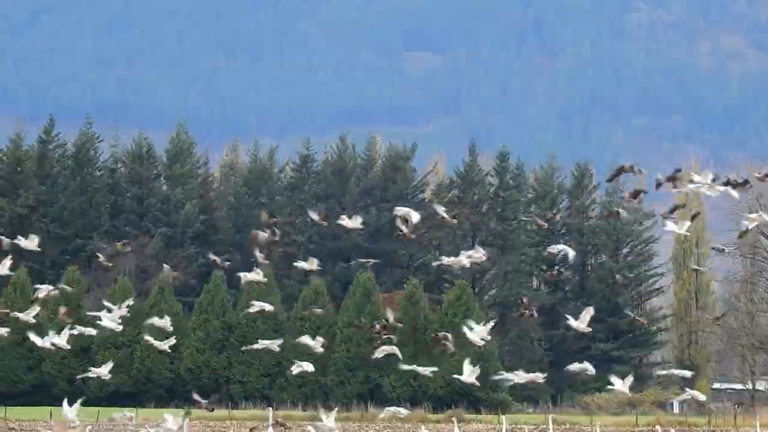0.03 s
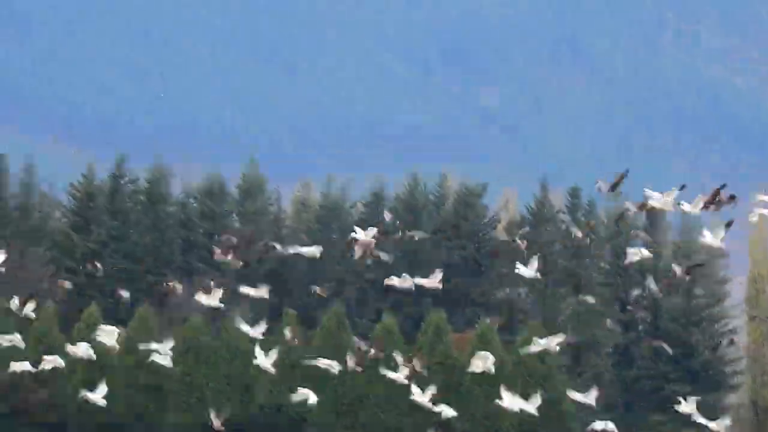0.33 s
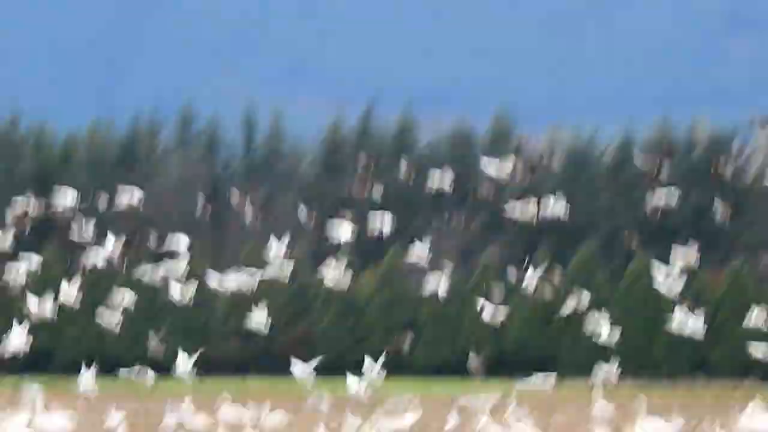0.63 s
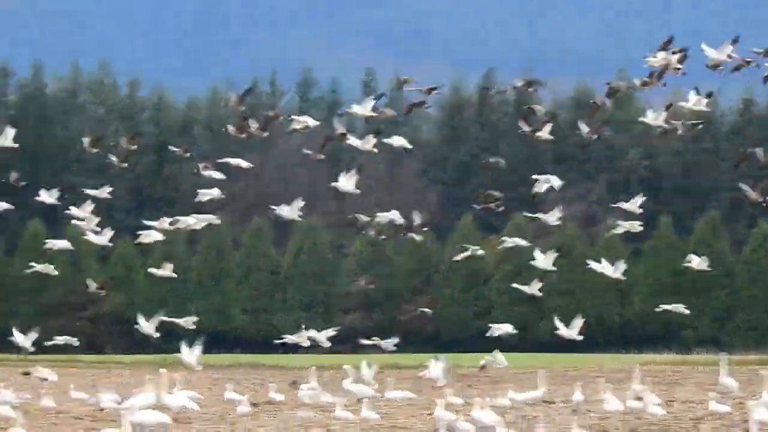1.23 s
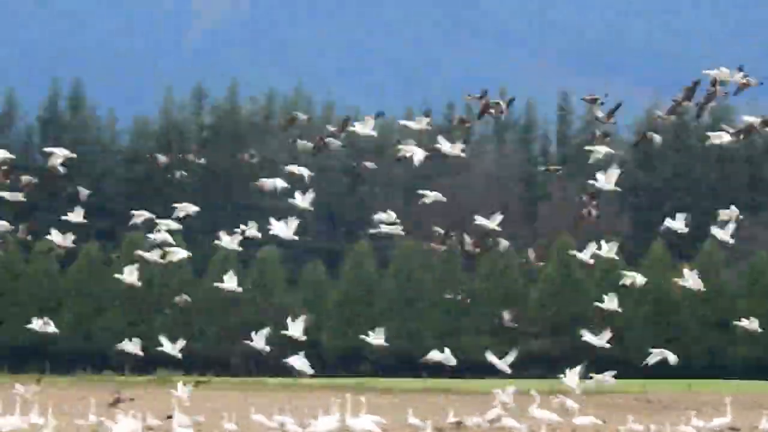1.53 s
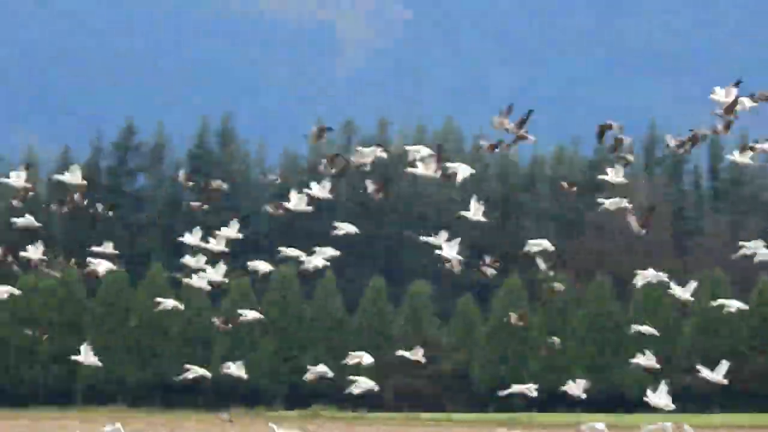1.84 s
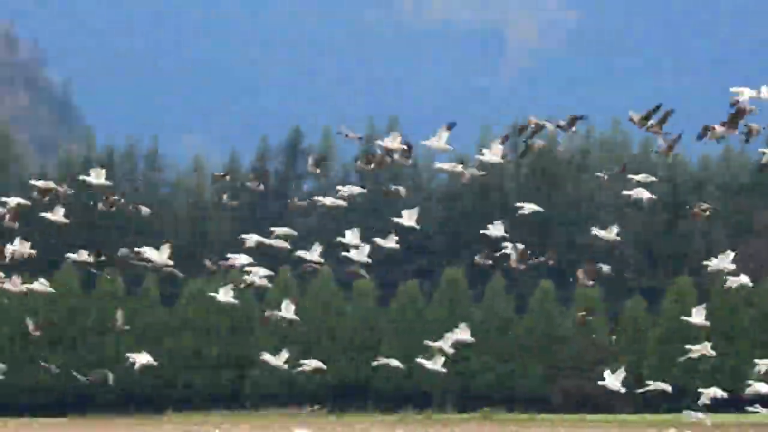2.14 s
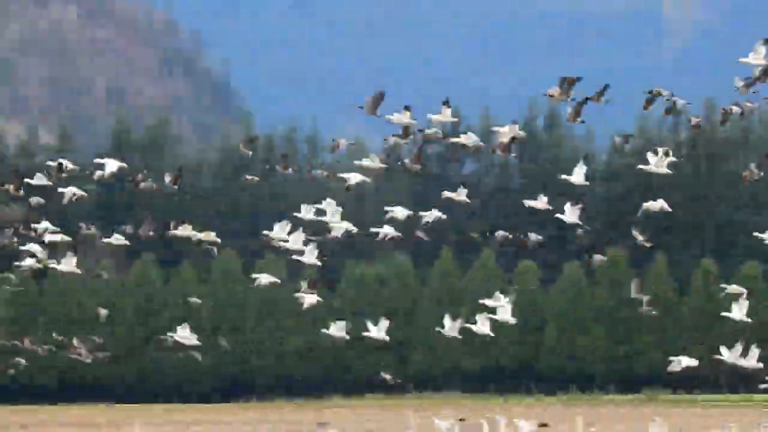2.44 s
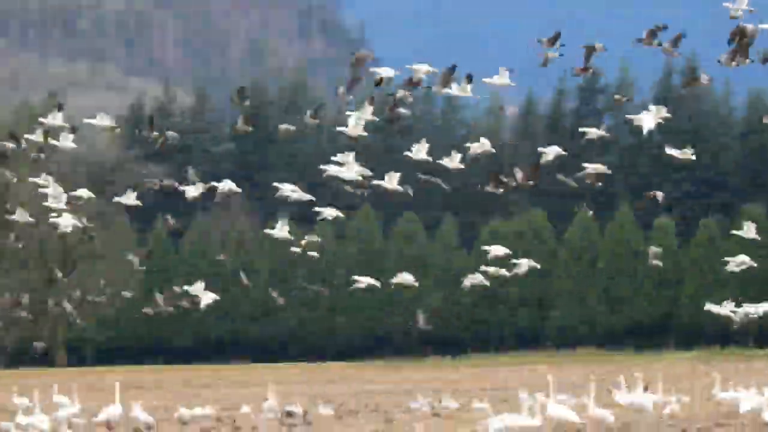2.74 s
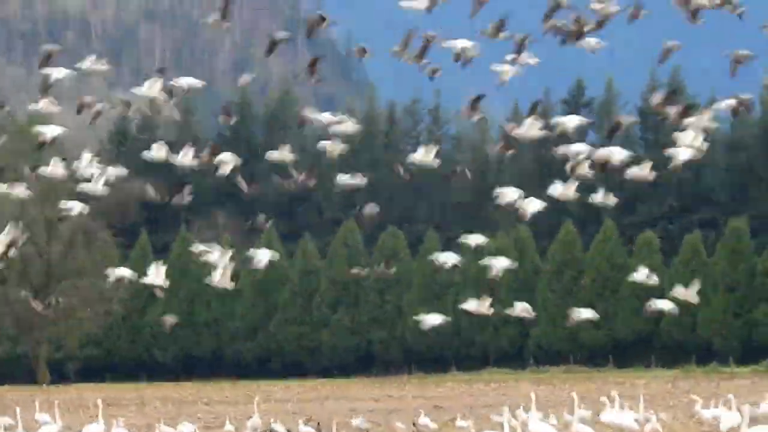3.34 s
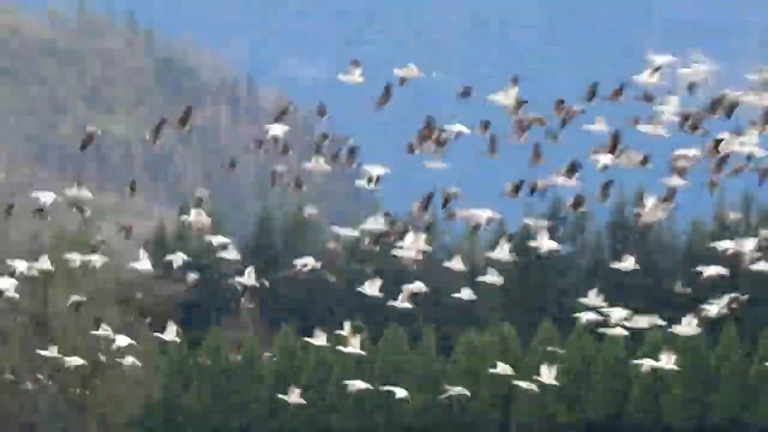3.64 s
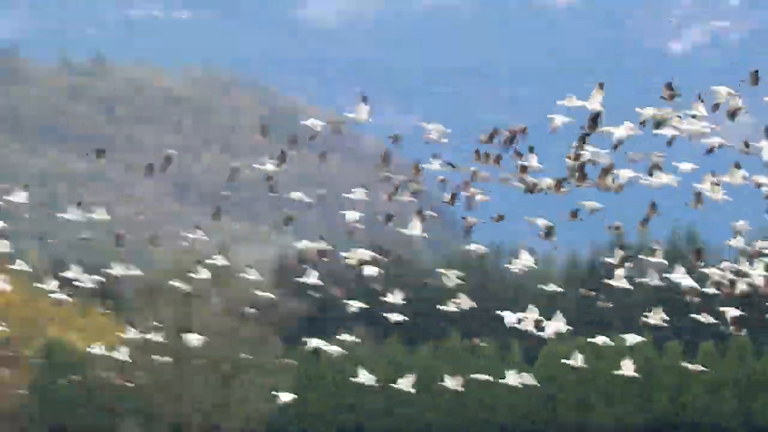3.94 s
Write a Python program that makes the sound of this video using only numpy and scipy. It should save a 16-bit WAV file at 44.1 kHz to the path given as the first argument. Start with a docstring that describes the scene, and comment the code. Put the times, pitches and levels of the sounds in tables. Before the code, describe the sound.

A large flock of geese honks over an open field for the whole four seconds, the dense chorus swelling and easing. Short, reedy honks from nearer birds stand out throughout, with shrill yelps at about 0.6 and 3.2 seconds. Faint wind and a low hum lie underneath. A few dull bumps touch the microphone, clearest around 0.4 and 3.4 seconds.

```python
"""A field under a big flock of snow geese. Each honk is a reedy arch of pitch, buzzed by the syrinx and
shaped by the throat. A few near birds stand out of a swelling chorus of hundreds, with one far hoot;
a tree line smears them all a little. Below lie faint wind, a low hum, and the microphone's own hiss
with a few soft bumps on it."""
import sys
import numpy as np
from scipy import signal
from scipy.fft import rfft, irfft
from scipy.io import wavfile

SR = 44100
rng = np.random.default_rng(int(sys.argv[2]) if len(sys.argv) > 2 else 0)


def inscribe(sig):
    """Save sig as 16-bit PCM at rate SR to the path in sys.argv[1].

    A 1-D sig is mono; a 2-D sig holds one channel per row.
    Samples are clipped to [-1, 1] before scaling.
    """
    pcm = np.round(np.clip(np.atleast_2d(sig).T, -1, 1) * 32767)
    wavfile.write(sys.argv[1], SR, pcm.astype(np.int16))


N = 176400

# goose throat response (frequency [Hz], gain [dB])
THROAT = [(400, -12), (650, -21.5), (860, -22), (1100, -13.5), (1400, -0.5), (1700, 4.5), (2100, 2.5),
          (2600, -5), (3200, -9.5), (3750, -7), (4400, -4), (5200, -5), (6200, -5.5), (7000, -18),
          (8000, -29.5), (10000, -46.5), (13000, -59.5)]


def syrinx(hz, balance_db, spread_db, rough, shake):
    """Trembling 20-harmonic buzz with its own timbre and direction."""
    size, k = 2048, np.arange(1, 21)
    db = balance_db(k) + spread_db * rng.standard_normal(len(k)) * (k != 2)
    harmonics = undb(db) * np.exp(2j * np.pi * rng.random(len(k))) * (k * hz.max() < SR / 2)
    cycle = irfft(np.r_[0, harmonics], size) * size / np.sqrt(2)
    tremble, rasp = shake
    stretch = (rng.integers(N) + np.arange(len(hz))) % N
    phase = np.cumsum(hz * (1 + tremble[stretch])) / SR
    pan_db, lag_s = rng.normal(-.7, 2), rng.normal(0, 22e-6)
    sides = np.array([[.5], [-.5]])
    buzz = cycle[((phase + sides * hz * lag_s) * size).astype(int) % size]
    return buzz * (1 + rough * rasp[stretch]) * undb(sides * pan_db)


def unsteadiness(jitter):
    """Pitch tremble and amplitude rasp; each bird takes its own stretch."""
    return jitter * wander(hz=400) + .007 * wander(hz=40), wander(hz=420)


def honk(length_s, top_hz, top_at, rise, fall, body_db=0, treble_db=0, **timbre):
    """One call: pitch scoops in, climbs to a top, sags and drops at the end."""
    attack_s, release_s, scoop_s, treble_hz = .02, .04, .008, 4000
    t = np.arange(int(length_s * SR)) / SR
    u, top = t / length_s, np.clip(top_at, .05, .97)
    before, after = np.maximum(top - u, 0) / top, np.maximum(u - top, 0) / (1 - top)
    scoop = np.exp(-t / scoop_s) + np.exp((t - length_s) / scoop_s)
    hz = top_hz * (1 - rise * before ** 2 - fall * after ** 2) * (1 - .05 * scoop)
    balance_db = lambda k: np.where(k * hz.mean() > treble_hz, treble_db, body_db * (k > 2))
    envelope = np.minimum(t / attack_s, 1) * np.minimum((length_s - t) / release_s, 1)
    return syrinx(hz, balance_db, **timbre) * envelope


def near_honks(shake):
    """Single honks of the nearest birds, through the throat."""
    # (start [s], length [s], top pitch [Hz], top position [0-1], rise [ratio], fall [ratio],
    #  gain [dB], body [dB], treble [dB])
    calls = [(0.186, 0.08, 1220, 0.95, 0.17, 0.01, -21, -13, -12),
             (0.216, 0.11, 879, 0.85, 0.083, 0.01, -31, 6.5, 2),
             (0.29, 0.11, 916, 0.9, 0.12, 0.03, -32.5, 3, -1),
             (0.368, 0.1, 1097, 0.6, 0.067, 0.065, -26.5, -4, 1.5),
             (0.452, 0.13, 1130, 0.43, 0.11, 0.09, -26.5, -6, -1.5),
             (0.456, 0.06, 970, 0.58, 0.17, 0.03, -34.5, -1, 11),
             (0.76, 0.12, 852, 0.6, 0.059, 0.06, -26.5, -5, 0.5),
             (0.771, 0.055, 1170, 1, 0.1, 0.01, -19, -17, -13),
             (0.877, 0.14, 1047, 0.9, 0.13, 0.02, -25.5, -10, -11),
             (1.07, 0.09, 945, 0.7, 0.05, 0.03, -36.5, 11, 7),
             (1.134, 0.15, 1006, 0.6, 0.09, 0.12, -40, -8, 2),
             (1.141, 0.133, 888, 0.83, 0.06, 0.01, -28, -7, 1),
             (1.337, 0.11, 1087, 0.9, 0.11, 0.012, -28, -4, -10),
             (1.734, 0.15, 1064, 0.4, 0.08, 0.077, -31, -22, -5),
             (1.75, 0.1, 935, 0.4, 0.1, 0.065, -30.5, 3, 8),
             (1.842, 0.098, 953, 0.85, 0.05, 0.026, -30, 2.5, 3.5),
             (1.954, 0.08, 821, 0.25, 0.044, 0.12, -35, -6, -12),
             (2.029, 0.2, 937, 0.3, 0.09, 0.074, -33, -3.5, 0.5),
             (2.266, 0.125, 851, 0.5, 0.0085, 0.072, -34.5, 4.5, 8.5),
             (2.344, 0.098, 976, 0.75, 0.1, 0.05, -32.5, 4.5, 1),
             (2.433, 0.098, 904, 0.6, 0.07, 0.01, -33.5, 3, 2.5),
             (2.545, 0.096, 907, 0.75, 0.1, 0.043, -34, 7.5, 1.5),
             (2.836, 0.09, 864, 0.5, 0.01, 0.08, -44.5, -2, 9),
             (2.861, 0.15, 855, 0.68, 0.04, 0.07, -27.5, -6.5, -11),
             (3.001, 0.1, 955, 0.3, 0.06, 0.032, -40, 11, 7),
             (3.121, 0.051, 822, 0.4, 0.031, 0.018, -31, 10, 5.5),
             (3.245, 0.1, 1200, 0.6, 0.06, 0.012, -32, 6.5, 4.5),
             (3.44, 0.096, 901, 0.64, 0.05, 0.016, -23, -18, -14),
             (3.623, 0.12, 971, 0.7, 0.089, 0.03, -35.5, 5, 7),
             (3.692, 0.11, 850, 1, 0.01, 0.041, -36.5, -7, 2.5),
             (3.78, 0.07, 1004, 0.28, 0.031, 0.092, -36, 13, -6),
             (3.834, 0.12, 855, 1, 0.02, 0.01, -27.5, -16, -4.5),
             (3.921, 0.11, 858, 1, 0.057, 0.01, -23.5, -3.5, -2)]
    out = np.zeros((2, N))
    for start_s, *arch, db, body_db, treble_db in calls:
        add(out, start_s, undb(db) * honk(*arch, body_db, treble_db, spread_db=2, rough=.25, shake=shake))
    return colour(out, THROAT)


def near_yelps(shake):
    """Two shrill yelps that step up in pitch and fall back, through the throat."""
    # per yelp (time [s], pitch [Hz], gain [dB])
    contours = [
        [(.575, 745, -48), (.61, 768, -37), (.64, 774, -35), (.655, 860, -30), (.666, 925, -33),
         (.68, 940, -33), (.70, 922, -33), (.72, 865, -28.5), (.735, 790, -30), (.765, 748, -40)],
        [(3.185, 833, -40), (3.215, 840, -34), (3.25, 848, -34), (3.272, 890, -32), (3.31, 903, -30),
         (3.338, 860, -42)],
    ]
    # per yelp, harmonic gains (1st and 2nd [dB], 3rd [dB], 4th [dB], 5th [dB], 6th [dB], 7th up [dB])
    balances = [(0, -3, 5, 4, 4, 9), (0, 10, -2, 2, 0, 11)]
    out = np.zeros((2, N))
    for contour, harmonics_db in zip(contours, balances):
        time_s, hz, db = np.array(contour).T
        t = np.arange(time_s[0], time_s[-1], 1 / SR)
        balance_db = lambda k: np.take(harmonics_db, k - 2, mode="clip")
        buzz = syrinx(np.interp(t, time_s, hz), balance_db, spread_db=0, rough=.2, shake=shake)
        add(out, time_s[0], buzz * undb(np.interp(t, time_s, db)))
    return colour(out, THROAT)


def crowd(calls_per_s, pitch_hz, shake):
    """Many birds calling at random moments, pitches and distances."""
    mean_length_s = .13
    out = np.zeros((2, N))
    for slot in range(int(calls_per_s * (N / SR + mean_length_s))):
        start_s = (slot + rng.random()) / calls_per_s - mean_length_s
        call = honk(mean_length_s * rng.uniform(.5, 1.5), pitch_hz * rng.lognormal(0, .11),
                    top_at=rng.uniform(.3, .85), rise=rng.uniform(0, .24), fall=rng.uniform(0, .18),
                    spread_db=3, rough=.17, shake=shake)
        nearness_db = min(rng.normal(0, 2.5), 5)
        add(out, start_s, call * undb(nearness_db))
    return unit(out)


def chorus(shake):
    """Body of the flock: honks and lower grunts, swelling in loudness and brightness."""
    # (time [s], middle level [dB], treble level [dB])
    swell = [(.06, -22.5, -31), (.15, -25, -28), (.25, -19.5, -23), (.49, -22.5, -25), (.6, -24.5, -36),
             (.68, -25, -31), (.75, -17.5, -23), (.8, -21, -24), (.97, -22, -23.5), (1.07, -27, -32.5),
             (1.22, -15.5, -28), (1.3, -23, -28.5), (1.42, -20, -24.5), (1.7, -21, -27.5),
             (1.85, -17.5, -22), (1.98, -20, -27.5), (2.069, -24, -33.5), (2.381, -16.5, -24),
             (2.7, -20, -25.5), (2.95, -17.5, -23.5), (3.1, -19.5, -27), (3.371, -18.5, -27),
             (3.48, -17, -24.5), (3.552, -18.5, -27), (4, -18.5, -25.5)]
    # colour of the farther birds (frequency [Hz], gain [dB])
    distance = [(450, 4), (800, 7), (1700, -1), (4000, -4.5), (10000, 1.5)]
    grunt_cut_hz, grunt_db = 650, -7.5
    split_hz, middle_trim_db, treble_trim_db = 3300, -1.2, -1.5
    low_cut = signal.butter(4, grunt_cut_hz, "high", fs=SR, output="sos")
    grunts = signal.sosfilt(low_cut, crowd(calls_per_s=30, pitch_hz=518.6, shake=shake))
    calls = crowd(calls_per_s=85, pitch_hz=880, shake=shake) + undb(grunt_db) * grunts
    birds = colour(colour(calls, THROAT), distance)
    middle = signal.sosfiltfilt(signal.butter(4, split_hz, fs=SR, output="sos"), birds)
    t = np.arange(N) / SR
    time_s, middle_db, treble_db = np.array(swell).T
    return (unit(middle) * undb(np.interp(t, time_s, middle_db) + middle_trim_db)
            + unit(birds - middle) * undb(np.interp(t, time_s, treble_db) + treble_trim_db))


def hoot(start_s=2.14, length_s=.13, pitch_hz=465, level_db=-41):
    """One far, low, pure call that sags a little."""
    u = np.clip((np.arange(N) / SR - start_s) / length_s, 0, 1)
    hz = pitch_hz * (1 + .021 * (.5 - u))
    return undb(level_db) * np.sin(np.pi * u) * np.sin(2 * np.pi * np.cumsum(hz) / SR)


def tree_line(x, t60_s=.45, echo_db=-11, width=.12):
    """Adds a short, soft scatter from ground and trees."""
    t = np.arange(SR // 2) / SR
    mid, side = rng.standard_normal((2, len(t))) * np.exp(-np.log(1000) * t / t60_s)
    tail = (mid + width * side * np.array([[1], [-1]])) / np.sqrt(np.sum(mid ** 2))
    return x + undb(echo_db) * signal.fftconvolve(x, tail, axes=1)[:, :N]


def wind(level_db=-30, flutter_db=2.5, flutter_hz=24.5, width=.046):
    """Fluttering wind noise and distant rumble."""
    # (frequency [Hz], gain [dB])
    spectrum = [(20, -54), (35, -22.5), (48, -13), (65, -10.5), (95, -5), (140, -5.5), (180, -2.5),
                (235, -2.5), (290, -10.5), (360, -14.5), (600, -17.5), (1500, -1.5), (6000, -35),
                (15000, -64)]
    mid, side = colour(rng.standard_normal((2, N)), spectrum)
    air = unit(mid) + width * unit(side) * np.array([[1], [-1]])
    return air * undb(level_db + flutter_db * wander(flutter_hz))


def hum(pitch_hz=96, rms_db=-46.5):
    """Faint low tone of wavering pitch."""
    hz = pitch_hz * (1 + .035 * wander(hz=10))
    return np.sqrt(2) * undb(rms_db) * np.sin(2 * np.pi * np.cumsum(hz) / SR)


def handling():
    """Dull bumps on the microphone, the first with a small tick."""
    # (start [s], pitch [Hz], gain [dB])
    bumps = [(0.392, 220, -8.5), (1.134, 202, -13), (1.422, 226, -16.5), (1.55, 175, -14),
             (2.708, 335, -16.5), (3.367, 218, -7)]
    # (frequency [Hz], gain [dB])
    tick_spectrum = [(1000, -20), (4500, 2), (7000, -3), (9500, -5), (13000, -26), (16000, -38)]
    tick_s, tick_decay_s, tick_db = .394, .0018, -12
    rise_s, decay_s = .012, .0084
    t = np.arange(N) / SR
    burst = rng.standard_normal(N) * (t > tick_s) * np.exp(-abs(t - tick_s) / tick_decay_s)
    out = undb(tick_db) * colour(burst, tick_spectrum)
    for start_s, hz, db in bumps:
        age_s = np.maximum(t - start_s, 0)
        envelope = np.minimum(age_s / rise_s, 1) * np.exp(-age_s / decay_s)
        out += undb(db) * envelope * np.sin(2 * np.pi * hz * age_s)
    return out


def hiss(rms_db=-86):
    """Microphone self-noise."""
    return undb(rms_db) * rng.standard_normal((2, N))


def undb(db):
    """Decibels to gain."""
    return 10 ** (np.asarray(db) / 20)


def unit(x):
    """Scale to rms 1."""
    return x / np.sqrt(np.mean(x ** 2) + 1e-18)


def colour(x, points):
    """Filter by (frequency [Hz], gain [dB]) points."""
    hz, db = np.array(points, float).T
    size = N + 8100  # padded against wrap-around
    f = np.maximum(np.fft.rfftfreq(size, 1 / SR), 1)
    gain = undb(np.interp(np.log(f), np.log(hz), db))
    return irfft(rfft(x, size) * gain, size)[..., :N]


def wander(hz):
    """Smooth noise of rms 1, rolling off at hz."""
    f = np.fft.rfftfreq(N, 1 / SR)
    return unit(irfft(rfft(rng.standard_normal(N)) * np.exp(-(f / hz) ** 2), N))


def add(out, start_s, sound):
    """Mix a stereo sound in at start_s."""
    i = int(start_s * SR)
    a, b = max(i, 0), min(i + sound.shape[1], N)
    if b > a:
        out[:, a:b] += sound[:, a - i:b - i]


def scene():
    """Flock, field and air."""
    near_shake, far_shake = unsteadiness(jitter=.0065), unsteadiness(jitter=.006)
    flock = near_honks(near_shake) + near_yelps(near_shake) + chorus(far_shake) + hoot()
    return tree_line(flock) + wind() + hum() + handling() + hiss()


def record(dry):
    """The microphone has two narrow dips, opens just after the start and cuts the top."""
    # (centre [Hz], width [Hz], gain [dB])
    notches = [(2390, 110, -6), (4010, 120, -5)]
    open_s, fade_s, top_hz = .045, .01, 15700
    t, f = np.arange(N) / SR, np.fft.rfftfreq(N, 1 / SR)
    dips_db = sum(db * np.exp(-((f - hz) / width_hz) ** 2) for hz, width_hz, db in notches)
    heard = irfft(rfft(dry) * undb(dips_db), N) * np.clip((t - open_s) / fade_s, 0, 1)
    return signal.sosfilt(signal.ellip(8, .2, 70, top_hz, fs=SR, output="sos"), heard)


dry = scene()
out = record(dry)
inscribe(out)
```